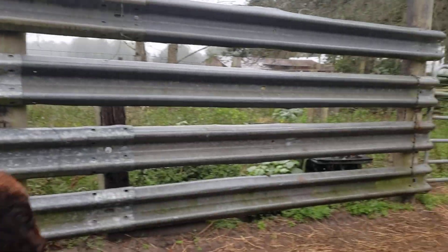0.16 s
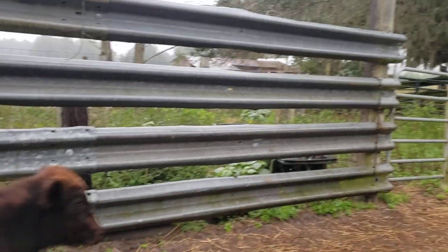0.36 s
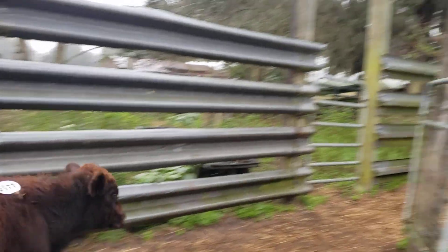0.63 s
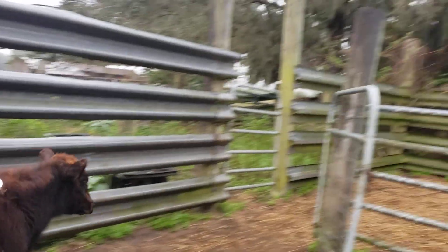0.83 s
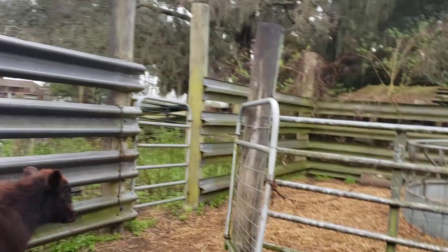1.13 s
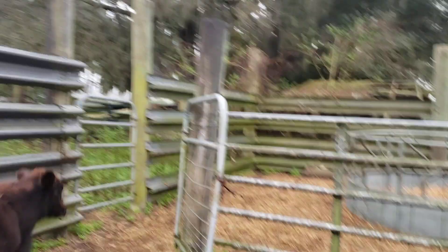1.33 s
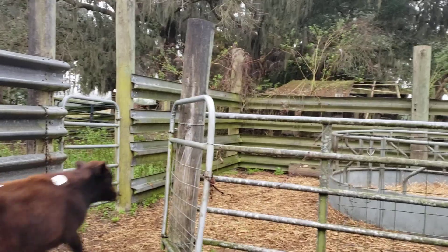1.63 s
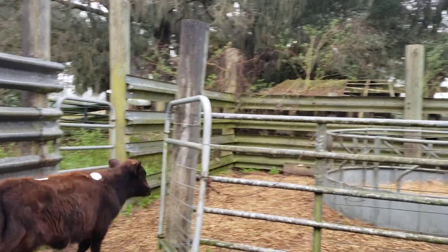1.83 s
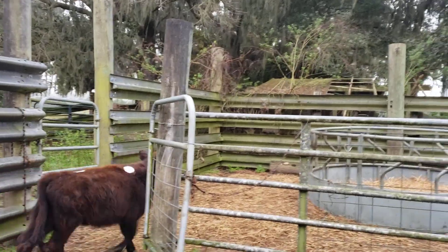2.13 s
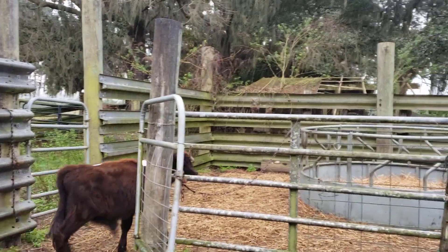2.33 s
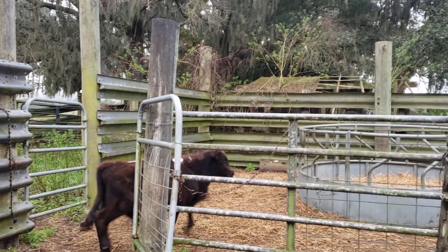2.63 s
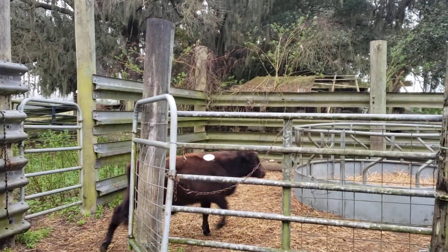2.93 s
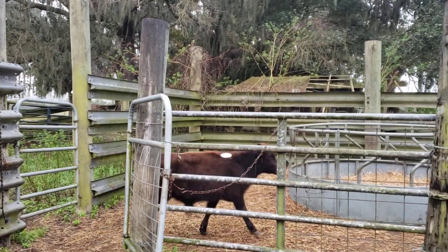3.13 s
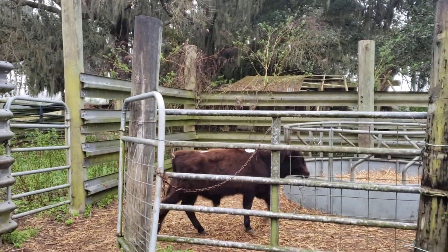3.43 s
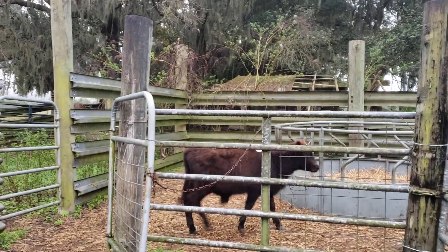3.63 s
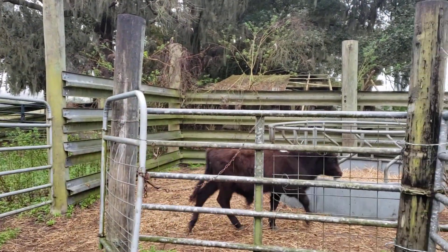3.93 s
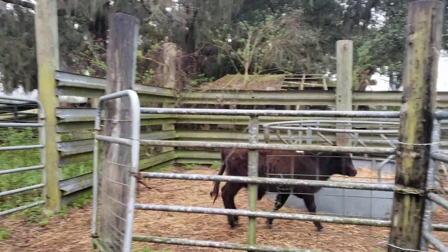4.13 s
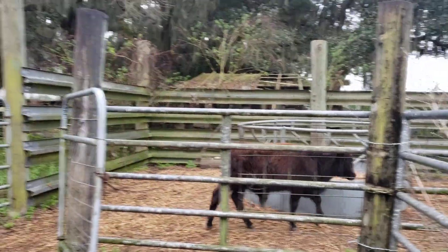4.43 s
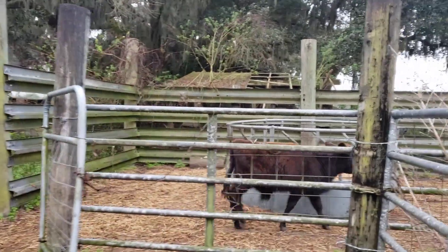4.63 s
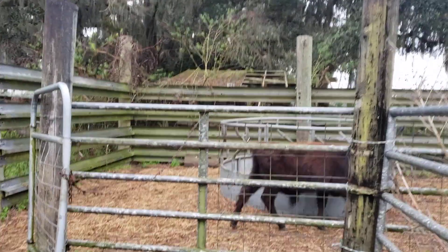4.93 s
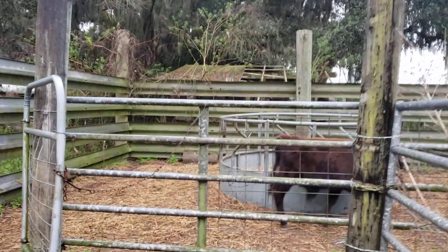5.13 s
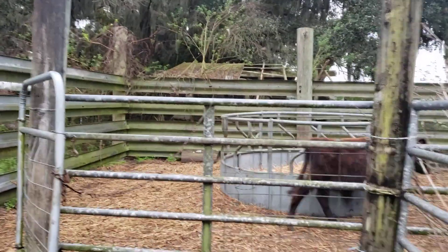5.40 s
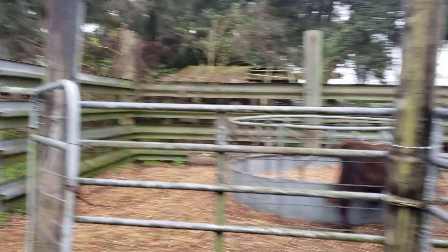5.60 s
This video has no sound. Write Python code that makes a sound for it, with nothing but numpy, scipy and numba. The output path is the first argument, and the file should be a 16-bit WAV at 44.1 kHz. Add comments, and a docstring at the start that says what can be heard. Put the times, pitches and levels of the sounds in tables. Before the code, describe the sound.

Someone walks close by over straw with soft thuds and hollow knocks, before a calf lets out a single loud drawn-out bawl that cracks downward.

```python
"""In a straw-covered cattle pen, under a low rumble, an insect's trill and far birds, someone walks close by.
The steps are short damped thuds, grains of crushed straw and hollow knocks made of ringing modes.
Then a calf's pulsed folds ring a closed mouth in soft grunts, and one long bawl opens through moving resonances.
A thin squeal, a near-pure tone, joins in; the bawl breaks downward with a gulp and the squeal outlasts it.
Two spaced microphone ports hear the voice from the right, with echoes off ground and steel rails."""
import sys
import numpy as np
from scipy import signal
from scipy.fft import rfft, irfft
from scipy.io import wavfile
from scipy.ndimage import uniform_filter1d
from numba import njit

SR = 44100
rng = np.random.default_rng(int(sys.argv[2]) if len(sys.argv) > 2 else 0)


def file_out(sig):
    """Save sig as 16-bit WAV at sys.argv[1]."""
    # one column per channel
    cols = np.atleast_2d(sig).T
    # limit, then scale
    lim = np.clip(cols, -1, 1)
    pcm = np.round(lim * 32767).astype(np.int16)
    wavfile.write(sys.argv[1], SR, pcm)


N = 254016

# Spectra list relative level; each coloured sound is brought to rms 1 before its own level applies.
# quiet air of the place: f/Hz, relative level/dB
AIR_COLOUR = [(59, -25), (100, -7), (166, -11), (334, -7), (379, -13.5), (812, -14), (962, -30),
              (1050, -19), (1930, -18.5), (2890, -23), (4800, -24), (6740, -22), (8320, -29.5),
              (13300, -15.5), (15700, -17.5)]
AIR_DB = -69.5
# insect trill: f/Hz, relative level/dB
TRILL_COLOUR = [(5700, -30), (6400, -6), (6800, -2.5), (7100, -8), (7450, -5), (8100, -35)]
TRILL_RATE_HZ = 46.6
# low rumble: f/Hz, relative level/dB
RUMBLE_COLOUR = [(15, -29), (30, -33), (50, -8), (64, -2.5), (80, -10.5), (120, -20), (220, -29.5)]
RUMBLE_DB, RUMBLE_SWELL_S = -58, 0.068
# far birds: t/s, length/s, start f/Hz, end f/Hz, level/dB, hoarseness (0-1, scales the pitch wobble)
BIRD_NOTES = [(0.739, 0.46, 2116, 2056, -71.5, 0.56), (2.373, 0.064, 2940, 3000, -76, 0.06),
              (2.587, 0.072, 2260, 2380, -82, .1), (2.722, 0.056, 2840, 2960, -72.5, 0.2),
              (3.024, 0.076, 2950, 2735, -68, 0.2), (3.082, 0.12, 2760, 2400, -77, 0.42),
              (3.243, 0.088, 2210, 2630, -75, 0.15), (3.353, .09, 2860, 2830, -71, 0.2)]
# straw crushed underfoot; the last row is a soft fading rustle after the bawl:
# t/s, crunch level/dB, crackle level/dB, length/s
STRAW_RUSTLES = [(0.031, -61, -50, 0.052), (0.227, -67, -60.5, 0.083), (0.574, -60, -57, 0.05),
                 (0.87, -68.5, -70, 0.16), (1.197, -67, -61.5, 0.066), (1.27, -50.5, -60.5, 0.03),
                 (1.492, -66, -61, 0.058), (1.817, -67.5, -62.5, 0.053), (2.137, -71.5, -65, 0.079),
                 (2.254, -75, -61, 0.15), (2.332, -61, -53, 0.039), (2.515, -74, -60.5, 0.04),
                 (3.037, -70.5, -50, 0.059), (3.387, -74, -64, 0.033), (3.688, -62, -57.5, 0.16),
                 (5.517, -57.5, -74, 0.36)]
# single stalks snapping: t/s, relative level/dB
STALK_SNAPS = [(0.044, -38), (0.1222, -45.5), (0.576, -52), (1.4977, -50), (1.5253, -46.5), (2.0158, -53),
               (2.3518, -36.5), (3.0495, -55), (3.498, -56), (3.7915, -45), (5.5856, -55), (5.674, -58)]
# spectra of the low crunch and the high crackle: f/Hz, relative level/dB
CRUNCH_COLOUR = [(200, 10.5), (450, 2), (1000, 2), (2300, 3), (3500, -10), (6000, -9.5), (9000, -34)]
CRACKLE_COLOUR = [(2500, -9), (5000, -11.5), (6800, 4.5), (8500, -9.5), (11000, 3.5), (14000, -0.5),
                  (16000, 8)]
# heels on soft ground: t/s, relative level/dB, ring f/Hz, level of the rumble that follows/dB
HEELS = [(0.056, -39, 79, -44), (0.287, -40, 104, -48), (0.34, -42.5, 95, -74), (0.584, -45.5, 108, -47.5),
         (0.638, -43.5, 80.7, -55), (0.909, -45, 79, -51), (1.04, -46, 88, -54), (1.208, -44.5, 87, -56),
         (1.257, -30.5, 134, -60), (1.586, -43, 127, -50), (1.836, -53, 96.9, -45), (1.888, -41.5, 85, -47),
         (2.232, -44, 137, -50), (2.563, -63, 80, -50), (2.98, -69, 70, -52.5)]
# hollow knocks of footsteps: t/s, relative level/dB, brightness/(dB per octave)
STEP_KNOCKS = [(0.353, -45, 5), (0.377, -57, 0), (1.274, -50, -4), (1.581, -47.5, -1.5), (2.231, -58, 0),
               (3.453, -57.5, -3)]
# modes struck by a step: f/Hz, relative level/dB, t60/s
KNOCK_MODES = [(317, 5, 0.068), (477, -12.5, 0.072), (566, -4, 0.18), (608, 3.5, 0.087), (730, -14, 0.1),
               (952, -8, 0.086), (1090, -24, 0.04), (1410, -20, .035), (1900, -27, 0.027)]
KNOCK_ATTACK_S = .004
# closed-mouth grunts: t/s, length/s, start f/Hz, end f/Hz, throat level/dB, fundamental level/dB
GRUNT_NOTES = [(3.59, 0.2, 129, 192.4, -45, -52.5), (3.743, 0.146, 104.5, 122.4, -50.5, -41)]
# spectrum of the grunts: f/Hz, relative level/dB
GRUNT_COLOUR = [(220, -6), (350, 1), (540, -4), (750, -5), (1000, -12.5), (1250, -8), (1650, -19),
                (2500, -20), (3000, -15.5), (3500, -23), (5000, -31), (7200, -29.5), (8200, -47)]
# a nasal resonance sinks through the first grunt
NASAL_START_HZ, NASAL_END_HZ, NASAL_WIDTH_HZ, NASAL_DB = 2140, 1960, 320, -1.5
# a faint low tone slides up under the bawl: t/s, length/s, start f/Hz, end f/Hz
LOW_SLIDE = (4.05, .22, 118, 218)
SLIDE_DB = -47.5
# second, high voice: t/s, f/Hz, level/dB
SQUEAL_PATH = [(4.75, 816, -42), (4.92, 852, -45), (5.25, 852, -64), (5.46, 882, -51), (5.52, 857.5, -42),
               (5.7, 834.3, -37.5), (5.76, 750, -61)]
# its partials: multiple of the pitch, relative level/dB
SQUEAL_PARTIALS = [(1, 0), (2, -14), (3, -23), (4, -30)]
# pitch of the vocal folds during the bawl: t/s, f/Hz
FOLD_PITCH = [(3.86, 121.7), (3.926, 127.4), (4.004, 132.5), (4.19, 140.7), (4.266, 142.5), (4.55, 147.8),
              (4.874, 147.8), (4.992, 149.0), (5.068, 147.9), (5.276, 142.8), (5.32, 141.0), (5.385, 134.9)]
BREAK_HZ_PER_S = 400   # pitch fall after the last row, as the voice breaks
# unevenness of the folds: t/s, roughness (0-1)
FOLD_ROUGHNESS = [(3.87, .11), (4.05, .1), (4.5, .075), (5.1, .08), (5.35, .14), (5.42, .3), (5.48, .5)]
# course of the bawl: t/s, effort level/dB, mouth opening (0-1)
CALL = [(3.86, -20.5, 0.17), (3.915, -0.8, 0.11), (3.97, 0.5, 0.05), (4.08, -1.5, 0.25), (4.2, -0.3, 0.24),
        (4.32, -0.95, 0.52), (4.44, -1.3, 0.54), (4.6, -0.8, 0.88), (4.85, -0.5, 0.83), (5.08, -1.05, 0.81),
        (5.2, 0.3, 0.59), (5.37, -3, 0.18), (5.44, -1.9, 0.46), (5.52, -41.5, 0.5)]
STRAIN_S = 0.29   # the pressed start relaxes to 1/e in this time
# nose, throat and mouth: centre f/Hz, shift with mouth open/Hz, width/Hz, level/dB,
# change with mouth open/dB, change under strain/dB, left-right level/dB
RESONANCES = [(240, 5, 84, -8, -22, 7.5, -2), (376.5, -2, 440, -6, -0.3, -5.5, -2.7),
              (686.3, 125, 43.5, 12, -24, -7, -0.1), (823.4, -72, 37.7, -13, 21.5, 21, -1.2),
              (1046, 22, 129, -14, 6.5, 0.5, -2.1), (1312, -23, 154, -5.5, 2.5, 6, -4),
              (1573, 31, 108, 0.34, -4.5, -0.5, -3.5), (2000, 184, 118, -6.5, 1, 4.5, -6.5),
              (2263, 151, 92, -3.5, -7, -8, -8), (2553, 110, 223, -15, -1.5, 15, -4),
              (2912, -109, 180, -11, -4.5, 5.5, -1.5), (3184, -102, 270, -19, 4.5, 10, -6.5)]
CHEST_DB, CHEST_OPEN_DB, CHEST_STRAIN_DB = -50, 14, 7.5   # the fundamental through the chest, before effort
# edge of each fold closure: f/Hz, relative level/dB
RASP_COLOUR = [(3000, -45), (3600, 11), (4200, -5.5), (5100, 5), (5800, -5), (7000, -3.5), (8000, -22),
               (9000, -18.5)]
RASP_DB, RASP_STRAIN_DB = -50.5, 16.5   # before effort
# treble with the mouth narrow, then wide: f/Hz, relative level/dB
SIZZLE_NARROW = [(5600, -8), (6800, -11), (7600, -2), (8200, -18), (10000, -17), (12000, 6.5), (14500, 5),
                 (16000, -18)]
SIZZLE_WIDE = [(5800, -39), (6600, -2), (7600, -3), (8200, -17), (9200, 1), (10000, -4.5), (11300, 3.5),
               (13000, -1), (14500, -8.5), (16000, -12)]
# course of the treble: t/s, relative level/dB
SIZZLE_COURSE = [(3.86, -62), (3.952, -53), (4.03, -56), (4.646, -46), (5.352, -45), (5.44, -46.5),
                 (5.52, -74)]
# hollow gulp of the throat as the voice breaks: f/Hz, relative level/dB
GULP_COLOUR = [(200, -28.5), (290, 4), (380, 6), (520, -24), (640, 6.5), (760, 5), (900, -8), (1100, -22)]
GULP_AT_S, GULP_LENGTH_S, GULP_DB = 5.441, .024, -23.5
# echoes off ground and rails: left delay/ms, right delay/ms, level/dB
ECHOES = [(2.6, 2.7, -19), (9.3, 11.2, -20), (19.0, 16.5, -22), (29.0, 33.0, -25)]
LEFT_LAG_MS = 0.4067
CUTOFF_HZ = 15750


def from_db(db):
    """Decibels to gain."""
    return np.exp(np.asarray(db) * (np.log(10) / 20))


def rms_one(x):
    """Scale to unit power."""
    return x / np.sqrt(np.mean(x ** 2) + 1e-20)


def seconds():
    """The time of every sample."""
    return np.arange(N) / SR


def in_time(rows):
    """The columns of a curve, sample by sample."""
    s, *columns = np.transpose(rows)
    return [np.interp(seconds(), s, c) for c in columns]


def during(rows):
    """One while a curve lasts, with short fades."""
    return np.clip(np.minimum(seconds() - rows[0][0], rows[-1][0] - seconds()) / .015, 0, 1)


def pan(left_db):
    """Gains of the two channels for a left-right difference, at constant power."""
    return rms_one(from_db([[left_db / 2], [-left_db / 2]]))


def delayed(x, ms):
    """A later copy, between samples by linear interpolation."""
    whole, part = divmod(abs(ms) * SR / 1000, 1)
    late = np.concatenate([np.zeros(int(whole) + 1), x])
    return (1 - part) * late[1:N + 1] + part * late[:N]


def colour(x, points):
    """Shape a sound by a spectrum that falls 36 dB per octave beyond its ends; rms 1."""
    hz, db = np.transpose(points)
    octave = np.log2(np.fft.rfftfreq(N, 1 / SR) + 1)
    outside = np.abs(octave - np.clip(octave, np.log2(hz[0]), np.log2(hz[-1])))
    gain_db = np.interp(octave, np.log2(hz), db) - 36 * outside
    return rms_one(irfft(rfft(x) * from_db(gain_db), N))


def stereo_noise(alike):
    """White noise, partly shared by both channels."""
    share = np.clip(alike, 0, 1)
    return np.sqrt(share) * rng.standard_normal(N) + np.sqrt(1 - share) * rng.standard_normal((2, N))


def drift(rate):
    """Smooth random wandering of rms 1; rate in Hz sets its speed."""
    count = N // 16
    hz = np.fft.rfftfreq(count, N / count / SR)
    slow = rms_one(irfft(rfft(rng.standard_normal(count)) / (1 + (hz / rate) ** 2), count))
    return np.interp(np.arange(N) * (count / N), np.arange(count), slow)


def evened(x):
    """Hold the power near 1 over a few voice cycles."""
    power = np.mean(np.atleast_2d(x) ** 2, axis=0)
    power = uniform_filter1d(uniform_filter1d(power, size=900), size=700)
    return x / np.sqrt(np.abs(power) + 1e-14)


def swell(start, length):
    """A quick rise to 1 at half the length, then a decay."""
    age = np.arange(int(8 * length * SR)) / (SR * length / 2)
    return np.concatenate([np.zeros(max(int(start * SR), 0)), age * np.exp(1 - age), np.zeros(N)])[:N]


def glide(start, length, start_hz, end_hz):
    """Pitch and arched envelope of a short sliding note."""
    part = np.clip((seconds() - start) / length, 0, 1)
    return start_hz + (end_hz - start_hz) * part, np.sin(np.pi * part)


def at_microphones(x):
    """Sound from the right reaches the left port late; ground and rails add echoes."""
    left, right = np.broadcast_to(x, (2, N))
    left = left + sum(from_db(db) * delayed(left, ms) for ms, _, db in ECHOES)
    right = right + sum(from_db(db) * delayed(right, ms) for _, ms, db in ECHOES)
    return np.array([delayed(left, LEFT_LAG_MS), right])


def yard(x, t60, dull_hz):
    """Fences and trees return a dull scatter: decaying noise, low-passed, after a 12 ms gap."""
    age = np.arange(SR) / SR
    tail = rng.standard_normal((2, SR)) * from_db(-60 * age / t60) * (age > .012)
    tail = signal.sosfilt(signal.butter(2, min(dull_hz, SR / 3), fs=SR, output="sos"), tail)
    return signal.fftconvolve(x, tail / np.sqrt(np.sum(tail ** 2) / 2), axes=1)[:, :N]


def outdoors(trill_db, trill_depth):
    """Quiet air is steady shaped noise; the insect's thin trill is a narrow noise band in fast pulses."""
    air = from_db(AIR_DB) * colour(stereo_noise(0.13), AIR_COLOUR)
    strokes = rms_one(1 + trill_depth * np.sin(2 * np.pi * TRILL_RATE_HZ * seconds()))
    trill = strokes * colour(stereo_noise(0.067), TRILL_COLOUR)
    return air + from_db(trill_db) * trill * pan(3.3)


def rumble():
    """A steady low rumble of shaped noise swells after every step; the powers add."""
    power = from_db(RUMBLE_DB) ** 2
    power = power + sum((from_db(db) * swell(s, RUMBLE_SWELL_S)) ** 2 for s, _, _, db in HEELS)
    return np.sqrt(power) * colour(stereo_noise(0.94), RUMBLE_COLOUR) * pan(-3.7)


def bird(waver):
    """Far birds: gliding sine whistles whose pitch wobbles fast with hoarseness."""
    out, wobble = np.zeros(N), waver * drift(160)
    for s, length, start_hz, end_hz, db, hoarse in BIRD_NOTES:
        hz, arch = glide(s, length, start_hz, end_hz)
        out += from_db(db) * arch * np.sin(2 * np.pi * np.cumsum(hz * (1 + hoarse * wobble)) / SR)
    return at_microphones(out)


def straw(grain_db, snap_db, snap_length):
    """Stalks rustle in clumps of tiny cracks, noise of uneven level; a few snap on their own."""
    crunch = sum(from_db(db) * swell(s, length) for s, db, _, length in STRAW_RUSTLES)
    crackle = sum(from_db(db) * swell(s, length) for s, _, db, length in STRAW_RUSTLES)
    snaps = sum(from_db(db + snap_db) * swell(s, snap_length) for s, db in STALK_SNAPS)
    grains = from_db(grain_db * drift(260))
    low = crunch * colour(stereo_noise(0.14) * np.sqrt(grains), CRUNCH_COLOUR)
    high = crackle * colour(stereo_noise(0.086) * grains, CRACKLE_COLOUR)
    high = high + snaps * colour(stereo_noise(0.28), CRACKLE_COLOUR)
    return low * pan(-5.0) + high * pan(-8.0)


def thuds(level_db, length, ground_hz, ground_db, ground_length, scuff_db):
    """Each heel gives a short damped push, and the ground answers deeper and longer, with a soft scuff."""
    out, pressure = np.zeros(N), np.zeros(N)
    for s, db, hz, _ in HEELS:
        near = slice(int(s * SR), int(s * SR) + SR)
        turn = 2 * np.pi * (seconds()[near] - s)
        out[near] += from_db(db) * swell(s, length)[near] * np.sin(hz * turn)
        out[near] += from_db(db + ground_db) * swell(s, ground_length)[near] * np.sin(ground_hz * turn)
        pressure += from_db(db) * swell(s, 1.86 * length)
    scuff = colour(stereo_noise(0.86), [(90, 5.5), (150, 8.5), (270, -0.5), (450, -17), (800, -23.5)])
    return from_db(level_db) * (out + from_db(scuff_db) * pressure * scuff) * pan(-2.3)


def knocks(level_db, spread_db, crack_db, crack_length):
    """A step lands with a short crack and strikes every damped mode with a strength of its own."""
    out = np.zeros(N)
    age = np.arange(SR // 4) / SR
    crack = colour(rng.standard_normal(N), [(250, -2), (500, 7), (850, 4.5), (1500, -9.5), (3000, -24)])
    for s, db, tilt_db in STEP_KNOCKS:
        ring = np.zeros(len(age))
        strengths = rng.normal(0, 1, len(KNOCK_MODES))
        for (hz, mode_db, t60), own in zip(KNOCK_MODES, strengths):
            strike_db = mode_db + tilt_db * np.log2(hz / 650) + spread_db * own
            ring += from_db(strike_db - 60 * age / t60) * np.sin(2 * np.pi * hz * age) * np.sign(own)
        at = int(s * SR)
        out[at:at + len(age)] += from_db(db + level_db) * ring * (1 - np.exp(-age / KNOCK_ATTACK_S))
        out += from_db(db + crack_db) * swell(s, crack_length) * crack
    return out * pan(-5.0)


def folds(pitch, rough, jitter=.02, shimmer=.7, puff_sharpness=1.6):
    """One sharp closure a cycle with a puff of turbulent air; timing and strength vary with roughness."""
    cycles = np.cumsum(pitch) / SR + jitter * rough * drift(36)
    from_closure = (cycles + .5) % 1 - .5
    offset = from_closure * SR / pitch   # in samples
    pulses = np.sqrt(SR / pitch) * np.sinc(offset) * np.exp(-(offset / 8) ** 2)
    pulses = pulses * (1 + shimmer * rough * drift(40))
    gate = .25 + np.exp(puff_sharpness * (np.cos(2 * np.pi * from_closure) - 1))
    fundamental = np.sqrt(2) * np.sin(2 * np.pi * cycles)
    return fundamental, pulses, rms_one(gate * rng.standard_normal(N))


@njit
def resonate(x, hz, width, sr):
    """A two-pole resonance with a moving centre."""
    r = np.exp(-np.pi * width / sr)
    y = np.zeros(len(x))
    for i in range(2, len(x)):
        push = (1 - r * r) / 2 * (x[i] - x[i - 2])
        y[i] = push + 2 * r * np.cos(2 * np.pi * hz[i] / sr) * y[i - 1] - r * r * y[i - 2]
    return y


def grunts(breathiness):
    """Soft, airy fold pulses pass the closed mouth and nose; a low sine slides up after them."""
    out = np.zeros(N)
    nasal_hz, _ = glide(*GRUNT_NOTES[0][:2], NASAL_START_HZ, NASAL_END_HZ)
    for s, length, start_hz, end_hz, throat_db, fundamental_db in GRUNT_NOTES:
        hz, arch = glide(s, length, start_hz, end_hz)
        fundamental, pulses, puffs = folds(hz, rough=.25)
        source = pulses + breathiness * colour(puffs, [(200, -16), (2000, 3), (8000, 9)])
        nose = resonate(resonate(source, nasal_hz, NASAL_WIDTH_HZ, SR), nasal_hz, NASAL_WIDTH_HZ, SR)
        pressure = 2 * np.clip((seconds() - s) / length, 0, 1)   # builds through each note
        voice = pressure * colour(source, GRUNT_COLOUR) + from_db(NASAL_DB) * arch * rms_one(nose)
        out += arch * (from_db(throat_db) * voice + from_db(fundamental_db) * fundamental)
    hz, arch = glide(*LOW_SLIDE)
    out += from_db(SLIDE_DB) * arch * np.sin(2 * np.pi * np.cumsum(hz) / SR)
    return at_microphones(out) * pan(-3.1)


def squeal(waver, flutter_db):
    """A second, near-pure oscillation in the larynx outlasts the bawl."""
    hz, level_db = in_time(SQUEAL_PATH)
    phase = 2 * np.pi * np.cumsum(hz * (1 + waver * drift(24.0))) / SR
    tone = sum(from_db(db + flutter_db * drift(25.0)) * np.sin(k * phase) for k, db in SQUEAL_PARTIALS)
    return evened(at_microphones(tone)) * from_db(level_db) * during(SQUEAL_PATH) * pan(-2.3)


def throat(source, mouth, strain, wander_db):
    """Resonances follow mouth and strain, their levels wavering; each acts twice to keep valleys dark."""
    out = np.zeros((2, N))
    for hz, shift_hz, width, db, open_db, strain_db, left_db in RESONANCES:
        centre = hz + shift_hz * mouth
        ring = resonate(resonate(source, centre, width, SR), centre, width, SR)
        level_db = db + open_db * mouth + strain_db * strain + wander_db * drift(4.1)
        out += ring * from_db(level_db) * pan(left_db)
    # the soft walls of the mouth swallow what lies above the last resonance
    return signal.sosfilt(signal.butter(14, 3450, fs=SR, output="sos"), out)


def mouth_ring(x, length):
    """Dense high modes spread each closure over a few milliseconds; they wander, and differ on each side."""
    age = np.arange(SR // 100) / SR
    shape = age * np.exp(-age / length)

    def one_side():
        """Three random responses fade in and out of each other."""
        return sum(drift(1.15) * signal.oaconvolve(x, rng.standard_normal(len(age)) * shape)[:N]
                   for _ in range(3))
    return np.array([one_side(), one_side()])


def bawl(turbulence, sizzle_db, hiss_share):
    """Fold pulses ring the throat; rasp and sizzle ride on every cycle, and a gulp ends the call."""
    (pitch,), (rough,), (effort_db, mouth) = in_time(FOLD_PITCH), in_time(FOLD_ROUGHNESS), in_time(CALL)
    since_break = np.maximum(seconds() - FOLD_PITCH[-1][0], 0)
    pitch = np.maximum(pitch - BREAK_HZ_PER_S * since_break, 80)
    strain = np.exp(-((seconds() - CALL[0][0]) / STRAIN_S) ** 2)
    fundamental, pulses, puffs = folds(pitch, rough)
    # turbulence is stronger toward the upper resonances
    breath = colour(puffs, [(200, -15), (900, -3.5), (1500, 5), (2500, 9), (4000, 19.5), (16000, -5.5)])
    source = pulses + turbulence * rough * breath
    voice = throat(source, mouth, strain, wander_db=1.0)
    voice += fundamental * from_db(CHEST_DB + CHEST_OPEN_DB * mouth + CHEST_STRAIN_DB * strain)
    edge = evened(mouth_ring(pulses + hiss_share * puffs, length=0.002))
    voice += colour(edge, RASP_COLOUR) * from_db(RASP_DB + RASP_STRAIN_DB * strain) * pan(2.5)
    sizzle = (1 - mouth) * colour(edge, SIZZLE_NARROW) + mouth * colour(edge, SIZZLE_WIDE)
    sizzle = sizzle * from_db(in_time(SIZZLE_COURSE)[0] + sizzle_db) * pan(-11.5)
    gulp_shape = np.exp(-((seconds() - GULP_AT_S) / GULP_LENGTH_S) ** 2)
    gulp = from_db(GULP_DB) * gulp_shape * colour(source, GULP_COLOUR)
    return at_microphones((voice * from_db(effort_db) + sizzle + gulp) * during(CALL))


def scene():
    """The calf and the steps in the open pen; voice, knocks and birds also scatter from the yard."""
    background = rumble() + outdoors(trill_db=-69.5, trill_depth=0.26)
    steps = straw(grain_db=3.0, snap_db=-1.0, snap_length=0.0024)
    steps = steps + thuds(level_db=-0.5, length=0.014, ground_hz=67.6, ground_db=-15.0,
                          ground_length=0.048, scuff_db=-7.0)
    far = bird(waver=0.0975)
    far = far + knocks(level_db=-5.5, spread_db=4.5, crack_db=-9.5, crack_length=0.009)
    far = far + grunts(breathiness=.8) + squeal(waver=.003, flutter_db=2.0)
    far = far + bawl(turbulence=1.82, sizzle_db=3.0, hiss_share=0.9)
    return background + steps + far + from_db(-16.5) * yard(far, t60=0.36, dull_hz=5500)


def record(dry):
    """A steep elliptic low-pass cuts the top."""
    return signal.sosfilt(signal.ellip(12, .1, 80, CUTOFF_HZ, fs=SR, output="sos"), dry)


dry = scene()
out = record(dry)
file_out(out)
```